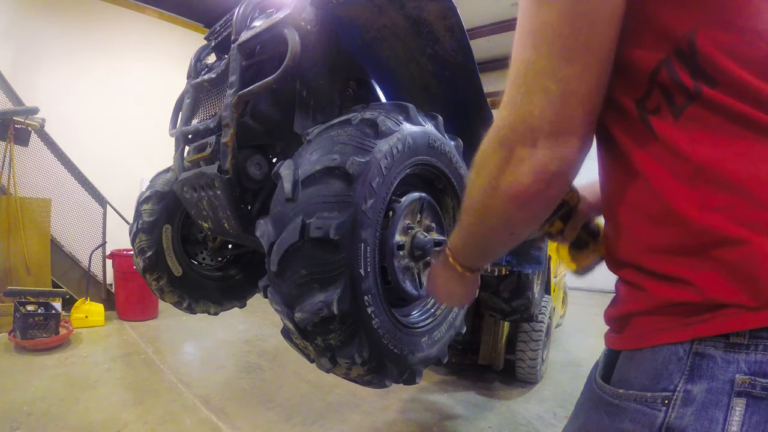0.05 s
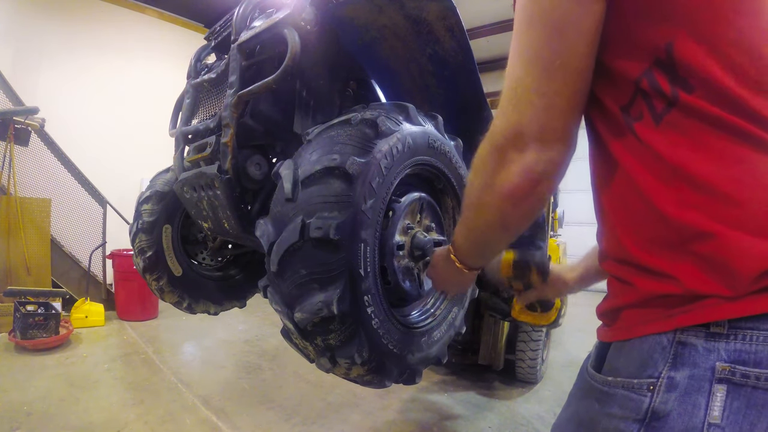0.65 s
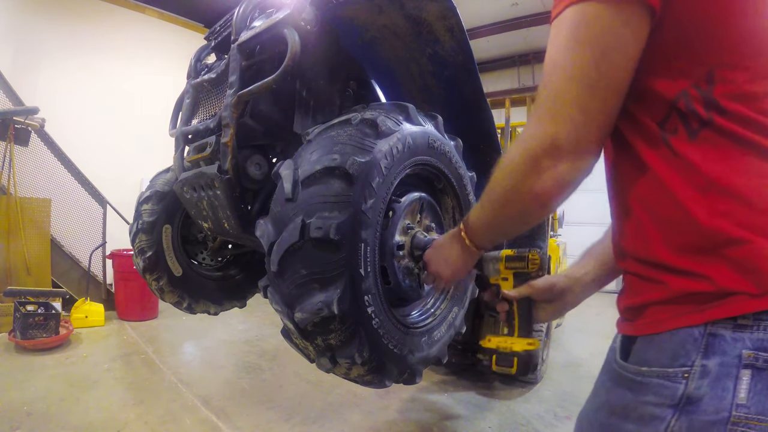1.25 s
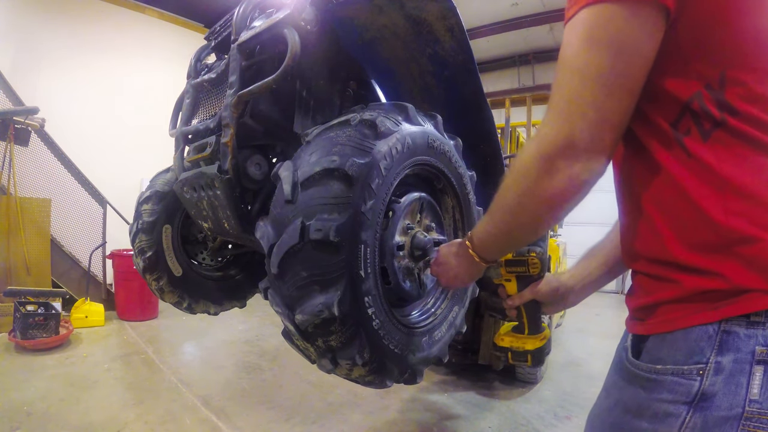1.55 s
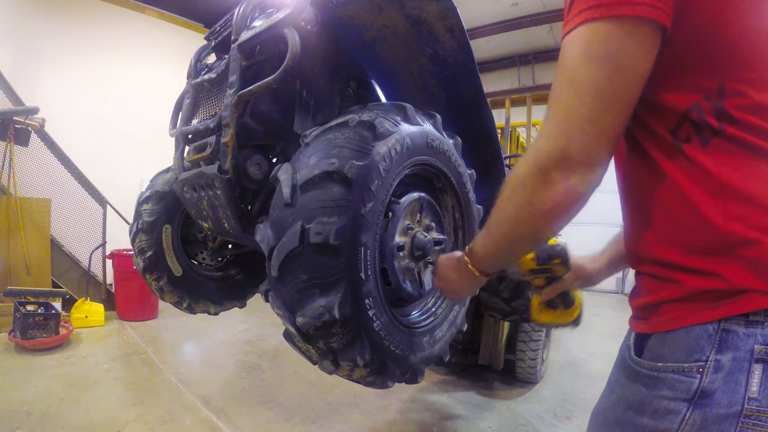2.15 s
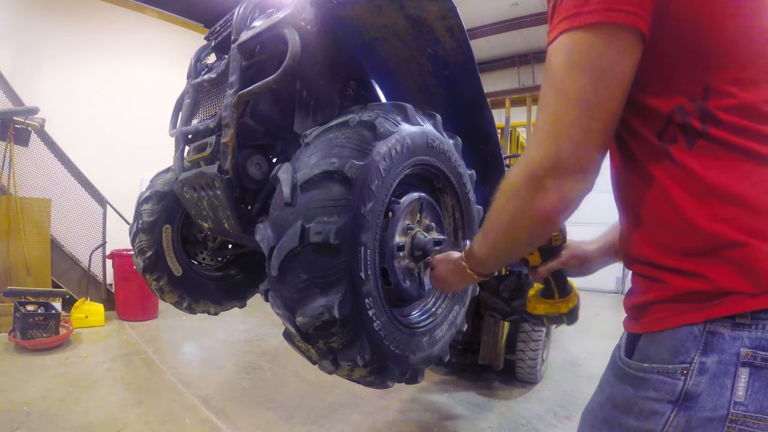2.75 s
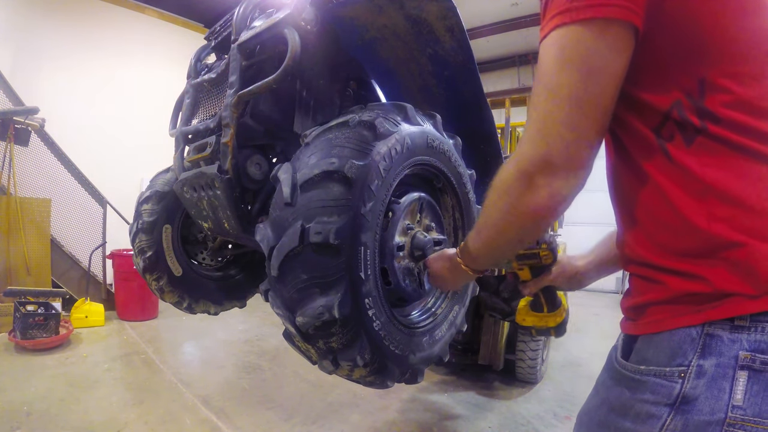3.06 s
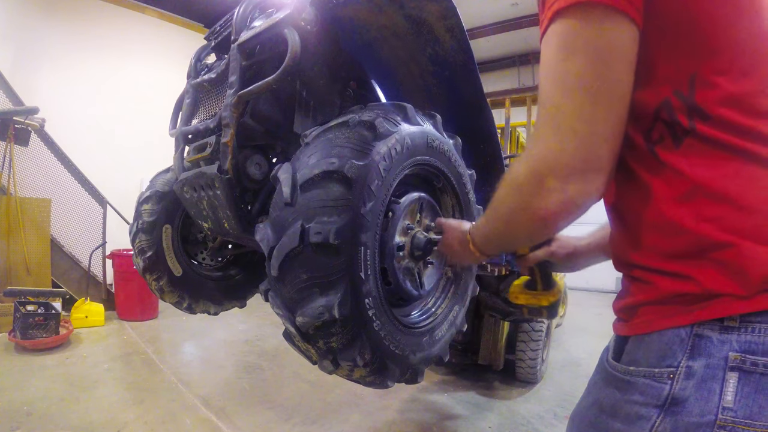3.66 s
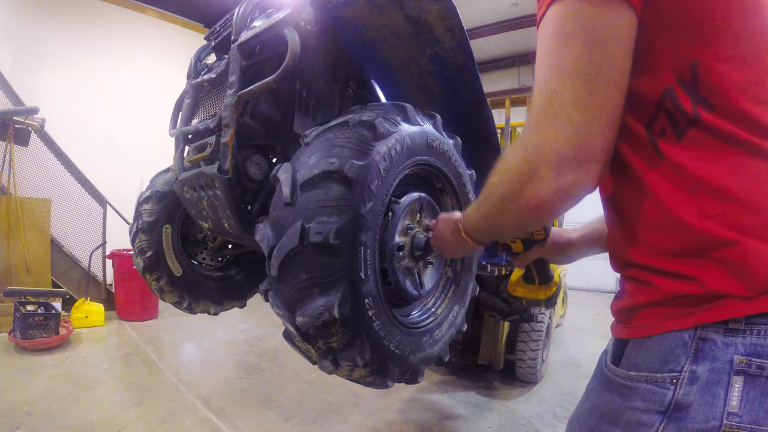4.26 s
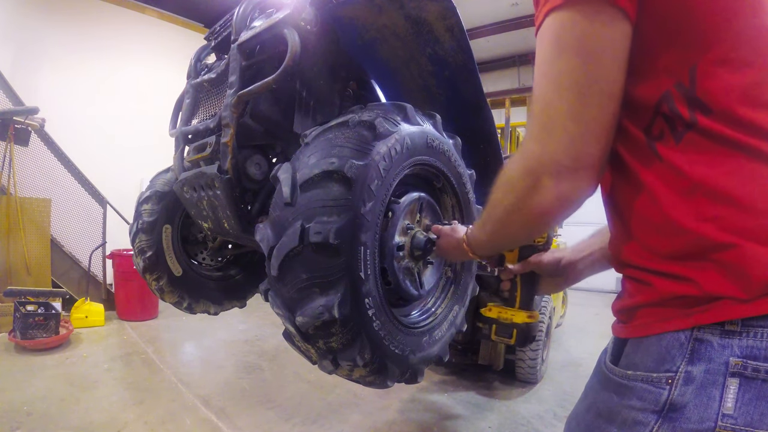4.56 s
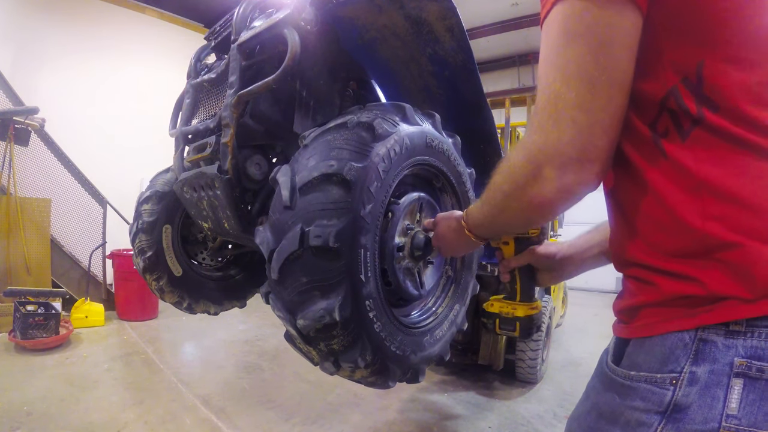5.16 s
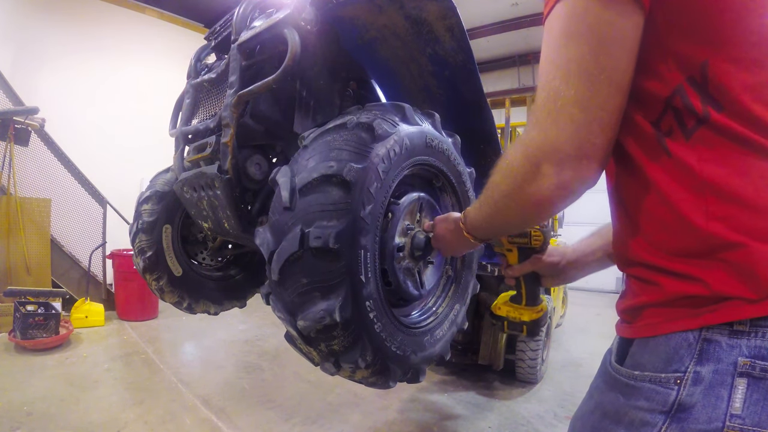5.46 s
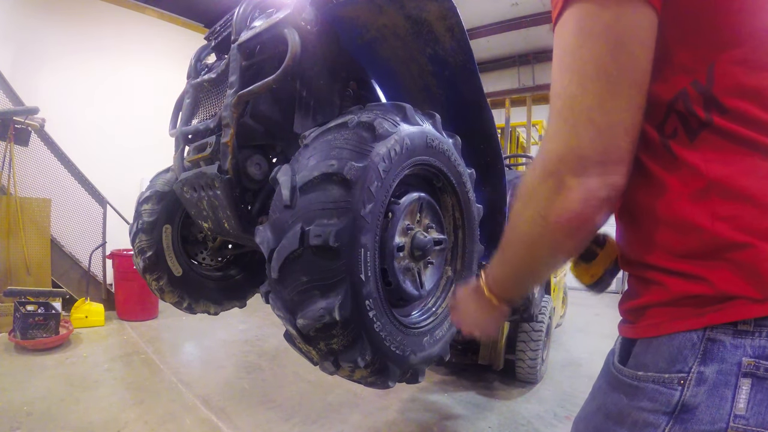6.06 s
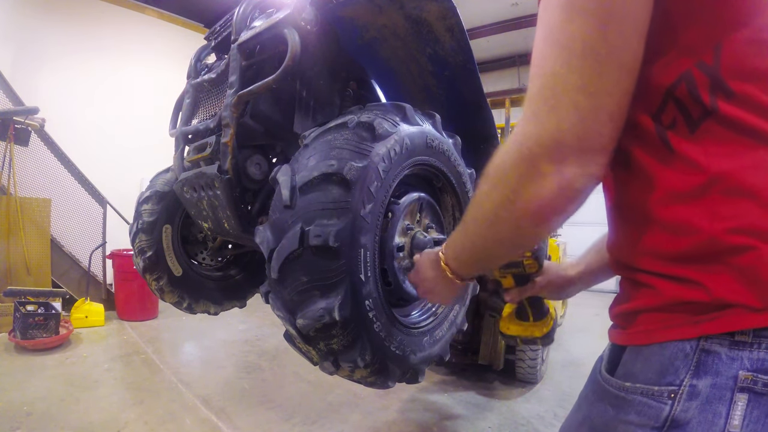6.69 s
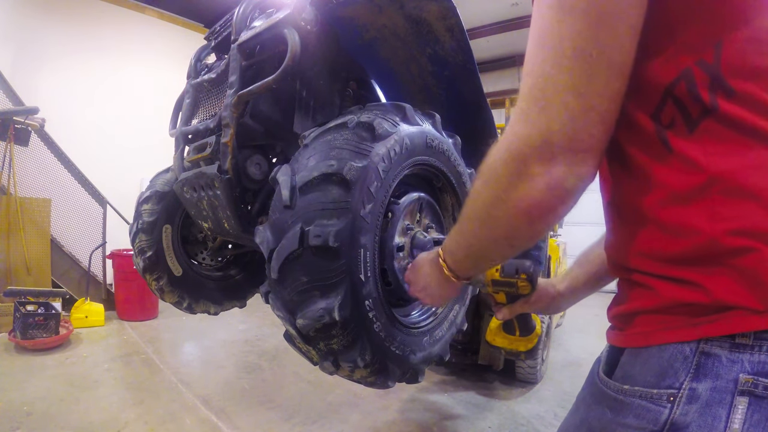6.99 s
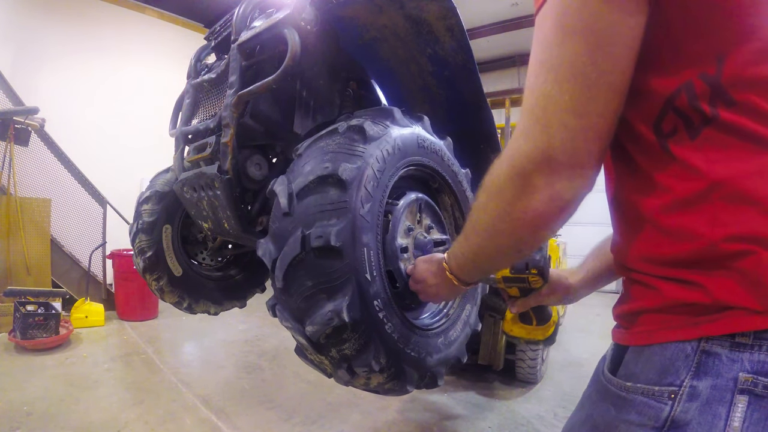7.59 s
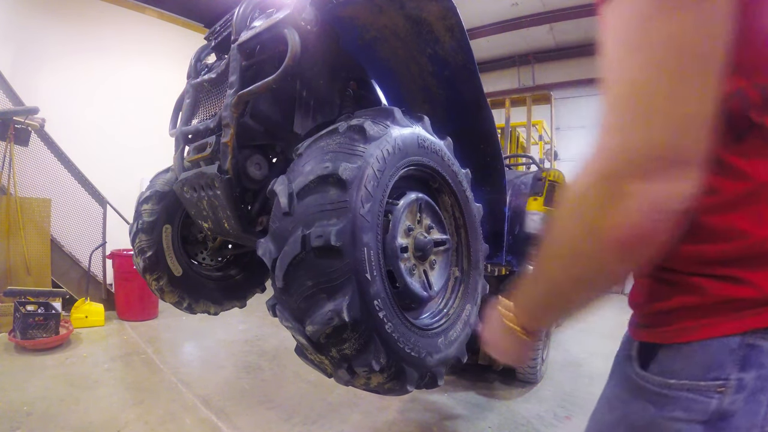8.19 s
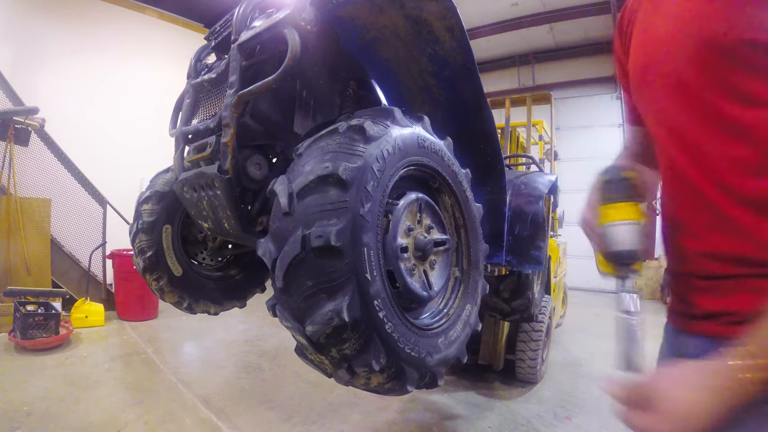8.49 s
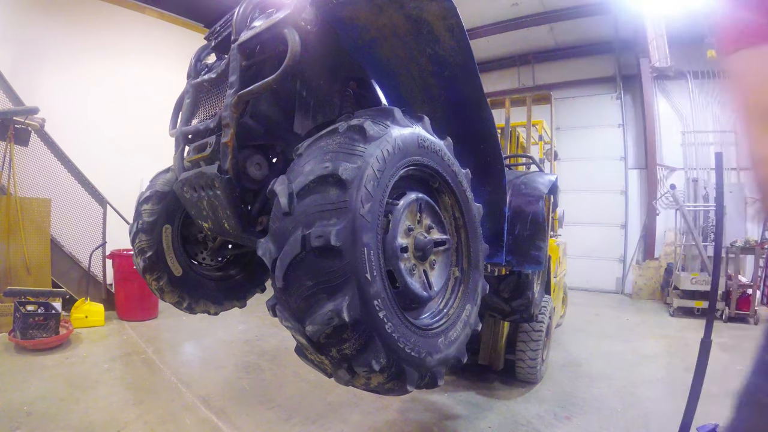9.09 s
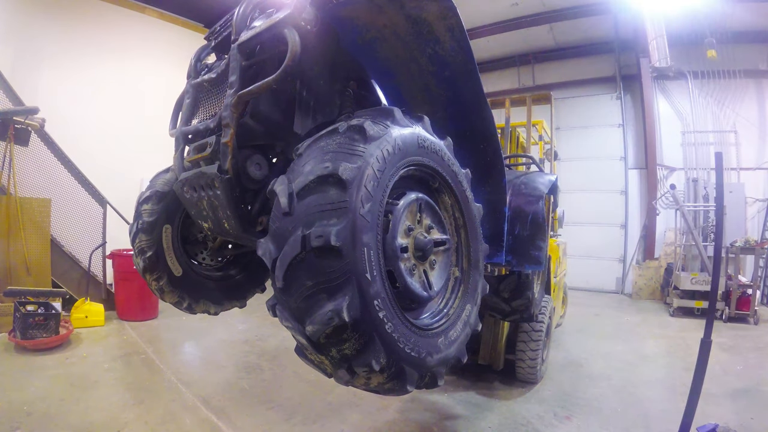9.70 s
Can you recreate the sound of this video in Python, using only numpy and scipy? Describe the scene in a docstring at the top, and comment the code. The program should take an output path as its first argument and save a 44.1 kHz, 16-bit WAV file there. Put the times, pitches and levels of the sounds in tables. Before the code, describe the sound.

A cordless impact wrench works close by in a large, reverberant workshop over a faint ventilation hum. A metal socket clacks against a wheel nut at about 0.5 and 1.2 seconds. At 1.4 seconds the wrench hammers loudly and rapidly for a third of a second, then spins the nut free with a rising gear whine that stops just after 2 seconds. Scattered metal clinks, ticks and soft handling knocks follow. A second burst comes at 5 seconds, whirring until about 5.7 and ending in bright ticks. The socket clacks on again between 6.6 and 6.8 seconds, and a third, shorter burst at 7 seconds runs into a whine that ends with two clinks near 7.8. Soft brushing follows from 8 to 9 seconds. At about 9.5 seconds something heavy is put down farther away with a thud and a few settling bumps.

```python
"""A cordless impact wrench takes three nuts off a wheel, close by, in a large workshop.
Its hammer strikes some 43 times a second, exciting the modes of socket and wheel; then the motor
spins the loose nut off with a gear whine. Between bursts come socket clacks, light metal ticks and
soft brushing; at the end something heavy is put down farther away. Ventilation hums, the room
reverberates, and a gain control turns everything down during each burst and lets it creep back."""
import sys
import numpy as np
from scipy import signal
from scipy.io import wavfile
from scipy.ndimage import uniform_filter1d

SR = 44100
rng = np.random.default_rng(int(sys.argv[2]) if len(sys.argv) > 2 else 0)


def log_audio(samples):
    """Write samples as a 16-bit WAV file to the path given in sys.argv[1]."""
    # one column per channel
    frames = np.atleast_2d(samples).T
    # limit to full scale, then quantise
    limited = np.clip(frames, -1, 1)
    pcm = np.round(limited * 32767).astype(np.int16)
    wavfile.write(sys.argv[1], SR, pcm)


N = 438336
TIME = np.arange(N) / SR
HIT_T = np.arange(8192) / SR  # t/s within one impact

# Trigger pulls: first full blow t/s, nut loose t/s, final blow rate/Hz, lag/s, lag settling/blows,
# blow level/dB, relative wheel boom/dB, relative socket ring/dB, fan whistle/dB, bearing tone/dB
TRIGGER_PULLS = [(1.4596, 1.765, 46.75, 0.023, 8.8, 9.5, 2, -19, -26.5, -46.5),
                 (4.9782, 5.283, 45.37, 0.0084, 2.45, 9, -0.5, -5, -37.5, -49.5),
                 (7.0004, 7.215, 44.99, .005, 1.26, 9, 0, -19, -26, -30.5)]
# Modes of the wheel on its hub: f/Hz, level/dB, T60/s
WHEEL_MODES = [(163.5, -4, 0.14), (217, -0.5, 0.073), (294, -6.5, 0.084), (338, -3.5, .05),
               (458, -7.5, 0.043), (474.6, 3.5, 0.054)]
# Impact spectra of the wheel's boom, the midrange clank and the treble fizz: f/Hz, level/dB
BOOM_SPECTRUM = [(25, -25.5), (100, -28.5), (150, -7), (200, -1), (280, -4.5), (480, 1), (580, -13.5),
                 (1000, -34)]
CLANK_SPECTRUM = [(300, -23), (600, -4), (850, -0.5), (1300, -4), (1700, 1), (2200, -4), (3200, -28)]
FIZZ_SPECTRUM = [(5000, -31.5), (7200, 2), (9000, -1), (10800, -1), (11800, -14), (13500, -14),
                 (15500, -33.5)]


def hammer(socket_hz=2685, socket_t60=.085):
    """Impact excitation: each blow sets anvil, socket and the wheel behind the nut vibrating freely."""
    crack_spectrum = [(900, -33), (1900, -13.5), (2400, -3.5), (3600, 3.5), (4900, -1), (5600, -4),
                      (6300, 0.5), (7100, -19.5), (9000, -37.5)]  # steel struck hard: f/Hz, level/dB
    steel_modes = [(2270, 0.5, 0.016), (3000, -10, 0.033), (3674, -1.5, 0.037), (3640, -2.5, 0.051),
                   (4100, -4, 0.029), (4740, -3.5, 0.055), (6230, -18, 0.027)]  # socket and anvil: f/Hz, level/dB, T60/s
    out = np.zeros(N)
    crack, boom, clank, fizz = map(impulse, (crack_spectrum, BOOM_SPECTRUM, CLANK_SPECTRUM, FIZZ_SPECTRUM))
    click = crack / abs(crack).max()
    swell = 1 - np.exp(-HIT_T / .0011)  # the heavy wheel takes a moment to move
    for t, db, boom_db, clank_db, fizz_db, ring_db in blows():
        steel = amp(-11) * burst(crack, hold=.0015, decay=.0053)
        steel += amp(-15) * ring(steel_modes, spread_db=6, detune=.003)
        socket = amp(ring_db - 60 * HIT_T / socket_t60) * np.sin(2 * np.pi * socket_hz * HIT_T)
        wheel = amp(-25) * burst(boom, hold=.0034, decay=.0038)
        wheel += amp(-17.5) * ring(WHEEL_MODES, spread_db=3, detune=.011)
        chatter = amp(clank_db - 24) * burst(clank, hold=.0039, decay=.0065)
        chatter += amp(fizz_db - 26.5) * burst(fizz, hold=.00093, decay=.0059)
        add(out, t + .001024, amp(db + fizz_db - 6.5) * click)
        add(out, t, amp(db) * (steel + socket + amp(boom_db) * swell * wheel + chatter))
    return out


def blows(bite_lead_s=.029, scatter_db=.56):
    """Weakening coupling: as the nut loosens, the quickening blows pass less energy into the wheel."""
    # A dull first blow takes up the slack: level/dB, then relative boom/dB, clank/dB, fizz/dB, ring/dB
    bite_levels = (-2, 4.5, 11.5, -13, -18.5)
    for first, loose, rate, lag, settle, db, boom_db, ring_db, _, _ in TRIGGER_PULLS:
        yield (first - bite_lead_s, *bite_levels)
        for k, (force, boom, clank, fizz) in enumerate(scatter_db * rng.standard_normal((20, 4))):
            t = first + k / rate + lag * (1 - np.exp(-k / settle))
            if t < loose:
                slack = (t - first) / (loose - first)
                binding = 1 - np.exp(-((k - 1.5) / 1.1) ** 2)  # the socket rings freely for two early blows
                yield (t, db - 3 * slack + force, boom_db - 13 * slack ** 2 + boom,
                       2 * clank - 3.5 * slack, 2 * fizz, ring_db - 11 * binding)


def motor(gear_ratio=5.9, fan_order=16, bearing_order=6.6, housing_hz=5290, housing_width_hz=240):
    """Rotational orders: gears, fan and bearing sound at multiples of the shaft speed, over a rattle."""
    free_runs = [
        [(1.81, 282, -38), (1.85, 305, -30), (1.90, 319, -24), (1.95, 327, -25), (2.0, 331, -24),
         (2.045, 332.5, -23), (2.075, 328, -28), (2.10, 319, -29), (2.125, 280, -33)],
        [(5.3, 262, -30), (5.34, 291, -27), (5.38, 310, -26), (5.45, 323, -26), (5.52, 329, -26),
         (5.62, 332, -29), (5.67, 318, -32), (5.70, 279, -22), (5.735, 270, -38)],
        [(7.25, 254, -26), (7.295, 276, -20), (7.34, 283, -19.5), (7.41, 282, -20), (7.53, 306, -21),
         (7.61, 320, -25), (7.67, 332, -38), (7.73, 318, -29), (7.77, 275, -28)],
    ]  # per pull, up to trigger release: t/s, shaft f/Hz, whine level/dB
    mesh_orders = [1, 6, 12, 18]  # gear tones: multiples of the shaft frequency
    mesh_levels = [-21, -4.5, -12.5, -17.5]  # those tones: level/dB
    rattle_spectrum = [(59, -84.5), (100, -55), (140, -21), (196, -12.5), (447, -9), (564, -15.5),
                       (861, -7.5), (1160, -9), (1730, -3.5), (2320, -3.5), (5170, -7.5), (7100, -20),
                       (11100, -31.5), (13400, -38.5), (15500, -79)]  # gears and socket: f/Hz, level/dB
    crawl_hz, loaded_hz = 100, 230  # shaft speeds
    out = np.zeros(N)
    # Dense contacts, a few of them louder.
    ticks = rng.standard_normal(N) * amp(2.5 * np.minimum(rng.exponential(1, N), 3))
    rattle = unit(colour(ticks, impulse(rattle_spectrum))) * amp(.8 * wander(90))
    sway, flutter = 1 + .0008 * wander(150), amp(2.4 * wander(60))
    for (first, loose, *_, fan_db, bearing_db), run in zip(TRIGGER_PULLS, free_runs):
        start, bite, free, release = first - .062, first - .029, run[0][0], run[-1][0]
        stop = release + .04
        on = (TIME >= start) & (TIME < stop)
        # The motor starts, strains, labours under the hammer, runs free and brakes.
        times, *columns = np.transpose([(start, crawl_hz, -41), (bite, loaded_hz, -37),
                                        (loose, loaded_hz, -37), *run, (stop, crawl_hz, -37)])
        shaft_hz, whine_db = (np.interp(TIME[on], times, column) for column in columns)
        rattle_stages = [(start, -41), (bite, -25), (first - .005, -10.5), (first + .022, -32.5),
                         (loose, -32.5), (free, -22), (release, -22), (stop, -38)]  # t/s, level/dB
        rattle_db = np.interp(TIME[on], *np.transpose(rattle_stages))
        angle = 2 * np.pi * np.cumsum(shaft_hz * sway[on]) / SR
        whine = amp(whine_db) * sum(amp(db) * np.sin(k * angle) for k, db in zip(mesh_orders, mesh_levels))
        # The fan whistle sweeps through a resonance of the housing.
        mistuning = 2 * (fan_order * shaft_hz - housing_hz) / housing_width_hz
        fan = amp(fan_db) * np.sin(fan_order * angle) / np.hypot(1, mistuning)
        near_top_speed = (shaft_hz / shaft_hz.max()) ** 8
        bearing = amp(bearing_db) * near_top_speed * np.sin(bearing_order * angle)
        throb = 1 + .22 * np.sin(2 * angle / gear_ratio)  # twice per turn of the socket
        out[on] += np.sqrt(2) * ((whine + bearing) * flutter[on] + fan)
        out[on] += amp(rattle_db) * rattle[on] * throb
    return out


def knocks():
    """Damped vibration: light contacts excite nut, socket and wheel, and the hand absorbs the ringing."""
    crack_spectrum = [(900, -31.5), (1800, -7), (2400, 3), (3000, -0.5), (3700, 4), (4300, -9),
                      (5000, -12.5), (7000, -38.5)]  # steel struck lightly: f/Hz, level/dB
    ping_spectrum = [(4000, -18.5), (4800, 3), (5500, 1.5), (6400, 7.5), (6900, -11), (7600, -10.5),
                     (11000, -45)]  # bright edge of the contact: f/Hz, level/dB
    nut_modes = [(1555, -9.5, .04), (1850, -13.5, 0.042), (2384, -6.5, 0.038), (2690, 2, 0.035),
                 (3134, -4, 0.06), (3677, 2.5, .035), (3860, -6, 0.044), (4170, -3, 0.032),
                 (4430, -6.5, 0.022)]  # nut and stud: f/Hz, level/dB, T60/s
    seat_modes = [(1050, -6.5, 0.03), (1586, -7, 0.03), (2137, 2.5, 0.036), (3540, -8, 0.058)]  # socket seating on a nut: f/Hz, level/dB, T60/s
    out = np.zeros(N)
    crack, ping = map(impulse, (crack_spectrum, ping_spectrum))
    boom, clank, fizz = map(impulse, (BOOM_SPECTRUM, CLANK_SPECTRUM, FIZZ_SPECTRUM))
    attack, damping = 1 - np.exp(-HIT_T / .00066), np.exp(-HIT_T / .0089)
    for t, crack_db, boom_db, clank_db, ping_db, fizz_db, seat_db in contacts():
        steel = amp(crack_db - 12.5) * burst(crack, hold=.001, decay=.0053)
        steel += amp(crack_db - 10) * ring(nut_modes, spread_db=3.5, detune=.007)
        socket = amp(seat_db - 2.5) * ring(seat_modes, spread_db=2, detune=.006)
        wheel = amp(boom_db - 2.5) * burst(boom, hold=.0075, decay=.0077)
        wheel += amp(boom_db - 2) * damping * ring(WHEEL_MODES, spread_db=4.5, detune=.03)
        chatter = amp(clank_db - 3.5) * burst(clank, hold=.00092, decay=.0064)
        edge = amp(ping_db - 6.5) * burst(ping, hold=.0047, decay=.006)
        edge += amp(fizz_db - 5.5) * burst(fizz, hold=.001, decay=.0053)
        add(out, t, (steel + socket + wheel + chatter + edge) * attack)
    return out


def contacts():
    """Energy partition: yields t/s and the level/dB of crack, boom, clank, ping, fizz and seating ring."""
    # Socket against nut and wheel: t/s, level/dB, then relative ping/dB, clank/dB, seating ring/dB
    clacks = [(0.4809, -10, -28, -15, -32), (0.4996, -19.5, -20, -10, -19), (0.5133, -6, -16, -16.5, -22),
              (1.2295, -18, -10, -10, -8), (1.2371, -6, -7.5, -11.5, -25), (1.8299, -5, -12, -11, -18),
              (2.949, -12, -8, -20, -36), (3.697, -14, -27, -11, -34), (3.7184, -2, -18, -22.5, -31),
              (4.1759, -18, -24, -11, -17), (4.1885, -13, -19.5, -10.5, -19),
              (4.1965, -20, -14, -8.5, -13.5), (4.7688, -25.5, -17.5, -23, -8),
              (4.7952, -12, -13, -9.5, -28), (4.8064, -20, -18, -3.5, -18.5), (6.5976, -5.5, -31, -17, -5),
              (6.745, -4, -19, -18.5, -10.5), (6.8301, -10, -6, -8, -3)]
    # Light, bright metal ticks, one being the sizzling edge of the clack at 2.949 s:
    # t/s, level/dB, then relative ping/dB, clank/dB
    ticks = [(2.1021, -6, -13.5, -10), (2.6354, -21.5, -20.5, -19), (2.847, -31.5, -13, -16),
             (2.934, -21, -6, -20), (2.951, -22, 1, -13), (3.1874, -28.5, -23, -12),
             (3.2365, -28.5, -15, -21), (3.4331, -44, -2, -15), (4.2984, -37, -24, 0.5),
             (4.57, -38, -17, -11), (5.695, -11, -14, -13), (5.7365, -11, -9.5, -9.5),
             (6.0646, -27, -7, -9.5), (7.7395, -13, -7, -10), (7.7706, -8, -9, -7),
             (9.0374, -43.5, -15, 3.5)]
    # Hand and tool against the wheel: t/s, boom level/dB, steel click level/dB
    bumps = [(0.5363, -31, -32.5), (0.6972, -33.5, -39.5), (0.7467, -32, -45), (0.907, -32.5, -32.5),
             (0.9657, -39.5, -31), (1.112, -42, -42), (1.1645, -30.5, -34.5), (1.1952, -35, -28.5),
             (3.0631, -28.5, -32.5), (3.9261, -35.5, -35.5), (4.2517, -40, -32), (4.5068, -38, -30),
             (4.7339, -37, -36.5), (4.9553, -8, -1)]
    for t, db, ping, clank, seat in clacks:
        boom_db = -24.5 + .3 * db  # the wheel answers light and hard clacks much alike
        yield t, db, boom_db, db + clank, db + ping, db + ping - 22.5, db + seat
    for t, db, ping, clank in ticks:
        yield t, db, db - 32.5, db + clank, db + ping, db + ping - 9, db - 34.5
    for t, boom_db, db in bumps:
        yield t, db, boom_db, db - 8, db - 20.5, db - 27.5, db - 14.5


def thumps():
    """Inelastic impact: a heavy load lands and settles; returns its dull body and its hard edge."""
    landings = [(9.485, -13, -15), (9.522, -35, -32.5), (9.57, -23.5, -52), (9.589, -24.5, -37),
                (9.617, -27, -51), (9.693, -30, -59), (9.866, -31, -72)]  # t/s, body level/dB, edge level/dB
    thud_spectrum = [(30, -21), (100, -24), (150, 4.5), (290, -8), (520, 0), (750, -4), (1100, -4.5),
                     (1600, -13), (2300, -18.5), (4000, -34.5)]  # dull body: f/Hz, level/dB
    edge_spectrum = [(500, -20), (1200, -8), (2200, 4.5), (3600, -2.5), (4600, -18), (7000, -24),
                     (14000, -55)]  # hard edge: f/Hz, level/dB
    body, rim = np.zeros((2, N))
    thud, edge = impulse(thud_spectrum), impulse(edge_spectrum)
    for t, db, edge_db in landings:
        add(body, t, amp(db - 4) * burst(thud, hold=.0029, decay=.013))
        add(rim, t, amp(edge_db - 3.5) * burst(edge, hold=.0034, decay=.0025))
    return body, rim


def noise_swells():
    """Band noise in short swells: brushing, and a low wash of ringing under the socket's seating clacks."""
    swells = [(2.998, 0.15, -60, 1200, 1.35), (4.674, .13, -48, 1200, 1), (6.594, 0.31, -47, 890, 1.18),
              (8.144, 0.2, -53.5, 3030, 0.64), (8.504, 0.097, -56.5, 2200, 0.69),
              (8.649, 0.15, -48, 2660, 0.62), (8.716, 0.31, -57.5, 1810, 1.1),
              (9.245, 0.25, -55, 1370, 0.21)]  # t/s, duration/s, level/dB, centre f/Hz, width/octaves
    out = np.zeros(N)
    hz = np.geomspace(200, 14000, num=40)
    uneven_noise = amp(2 * wander(110)) * rng.standard_normal(N)
    for t, length, db, centre_hz, octaves in swells:
        shape_db = np.maximum(-4 * (np.log2(hz / centre_hz) / octaves) ** 2, -40)
        band = impulse(np.column_stack([hz, shape_db]))
        swell = unit(colour(uneven_noise[round(t * SR):][:round(length * SR)], band))
        add(out, t, amp(db) * swell * signal.windows.tukey(len(swell), .7))
    return out


def walls(spin, directions=3):
    """Directivity: struck metal radiates a different colour each way, and each returns by its own path."""
    room = np.zeros(N)
    for _ in range(directions):
        body, rim = thumps()
        wrench = amp(-14.5) * hammer() + amp(-14) * knocks() + amp(-16.5) * spin
        room += hall(wrench + amp(-7) * body + amp(-14) * rim)
    return room / np.sqrt(directions)


def hall(x, delay_s=.009, echoes_per_s=4000):
    """Reverberation: sparse reflections from floor and walls decay exponentially, band by band."""
    decay_times = [(150, 0.5), (500, 0.51), (1500, 0.6043), (3500, 0.95), (7000, 0.48), (14000, 0.3)]  # workshop: f/Hz, T60/s
    echo_spectrum = [(110, 0), (150, 5.5), (260, -3), (500, -2), (1500, -0.5), (3500, -8.5), (7000, -4),
                     (14000, -4)]  # reflections: f/Hz, level/dB
    taps = rng.standard_normal(SR) * (rng.random(SR) < echoes_per_s / SR) * (TIME[:SR] > delay_s)
    hz, t, bands = signal.stft(taps, SR, nperseg=256)
    fade = amp(read(echo_spectrum, hz)[:, None] - 60 * t / read(decay_times, hz)[:, None])
    tail = signal.istft(bands * fade, SR, nperseg=256)[1]
    return colour(x, tail / np.linalg.norm(tail))


def background():
    """Broadband noise: a steady ventilation hum, an uneven rustle of clothes and a fine hiss."""
    hum_spectrum = [(25, -20.5), (70, -9.5), (105, -30.5), (150, 0), (195, -0.5), (250, -9.5), (370, -8.5),
                    (480, -16.5), (800, -20.5), (2000, -45)]  # f/Hz, level/dB
    rustle_spectrum = [(250, -16), (550, 0.5), (1000, 0.5), (1600, -0.5), (2600, -4.5), (3800, -8),
                       (5000, -22), (8000, -26.5)]  # f/Hz, level/dB
    hiss_spectrum = [(1000, -5), (3500, -6), (5200, -8.5), (6500, 2.5), (9000, -0.5), (11000, -5.5),
                     (15000, -11.5), (16000, -27)]  # f/Hz, level/dB
    hum, rustle, hiss = (unit(colour(rng.standard_normal(N), impulse(spectrum)))
                         for spectrum in (hum_spectrum, rustle_spectrum, hiss_spectrum))
    rustle_db = -57.5 + 2 * wander(60) + wander(8.9)
    return amp(-49) * hum + amp(rustle_db) * rustle + amp(-63) * hiss


def burst(response, hold, decay):
    """Modal overlap: dense resonances merge into noise that holds, then decays (both times in s)."""
    envelope = np.exp(-np.maximum(HIT_T - hold, 0) / decay)
    return unit_peak(colour(envelope * rng.standard_normal(len(HIT_T)), response))


def ring(modes, spread_db, detune):
    """Modal superposition: damped sinusoids, weighted differently by every point of contact."""
    hz, db, t60 = np.transpose(modes)[:, :, None]
    weight, shift, side = rng.standard_normal((3, len(modes), 1))
    waves = np.sign(side) * np.sin(2 * np.pi * hz * (1 + detune * shift) * HIT_T)
    return unit_peak((waves * amp(db + spread_db * weight - 60 * HIT_T / t60)).sum(0))


def impulse(spectrum, size=4096):
    """Minimum-phase response of a spectrum that falls 10 dB per octave beyond its ends."""
    hz = abs(np.fft.fftfreq(size, 1 / SR))
    octaves_above = np.maximum(np.log2((hz + 1) / spectrum[-1][0]), 0)
    octaves_below = np.maximum(np.log2(spectrum[0][0] / (hz + 10)), 0)
    log_gain = np.log(amp(read(spectrum, hz) - 10 * (octaves_above + octaves_below)))
    return np.fft.ifft(np.exp(np.conj(signal.hilbert(log_gain)))).real[:size // 2]


def colour(x, response):
    """Convolution, cut to the length of x."""
    return signal.oaconvolve(x, response)[:len(x)]


def wander(rate):
    """Random modulation of rms 1, with `rate` new values a second."""
    knots = rng.standard_normal(int(TIME[-1] * rate) + 2)
    return unit(np.interp(TIME * rate, np.arange(len(knots)), knots))


def read(points, hz):
    """Interpolation on a log-frequency axis."""
    f, value = np.transpose(points)
    return np.interp(np.log(hz + 1), np.log(f), value)


def add(mix, t, sound):
    """Superposition of a sound on the mix at t/s."""
    part = mix[max(round(t * SR), 0):][:len(sound)]
    part += sound[:len(part)]


def amp(db):
    """Amplitude ratio of a level/dB."""
    return 10 ** (np.asarray(db) / 20)


def unit(x):
    """Normalisation to rms 1."""
    return x / np.sqrt(np.mean(x ** 2) + 1e-20)


def unit_peak(x):
    """Normalisation of the loudest 5 ms to rms 1."""
    return x / np.sqrt(uniform_filter1d(x ** 2, 220).max() + 1e-20)


def gain_control(x, threshold_db=-27.5, range_db=9.5, start_cut_db=5, sense_s=.18, recover_db_per_s=12):
    """Compression: sustained power lowers the gain, which starts partly down and recovers slowly."""
    pole = np.exp(-1 / (sense_s * SR))
    power_db = 10 * np.log10(signal.lfilter([1 - pole], [1, -pole], x[0] ** 2) + 1e-12)
    cut_db = np.clip(power_db - threshold_db, 0, range_db)
    recovered = recover_db_per_s * TIME
    return x * amp(recovered - np.maximum(np.maximum.accumulate(cut_db + recovered), start_cut_db))


def scene():
    """Direct and reverberant fields: near sounds are mostly direct; the far thump excites the room more."""
    spin = motor()
    direct = hammer() + knocks() + spin + noise_swells() + sum(thumps())
    return (direct + walls(spin) + background())[None]


def record(dry):
    """Transduction: the microphone sheds bass; gain control, soft saturation and a band limit follow."""
    bass_leak, ceiling, cutoff_hz = .35, 1.05, 15500
    thin = signal.sosfilt(signal.butter(8, 128, "highpass", fs=SR, output="sos"), dry)
    deep = signal.sosfilt(signal.butter(4, 65, "lowpass", fs=SR, output="sos"), dry)
    held = gain_control(thin + bass_leak * deep)
    rounded = held / (1 + (held / ceiling) ** 4) ** .25
    band_limit = signal.firwin(255, cutoff_hz, window=("kaiser", 8), fs=SR)
    return signal.oaconvolve(rounded, band_limit[None], "same")


dry = scene()
out = record(dry)
log_audio(out)
```